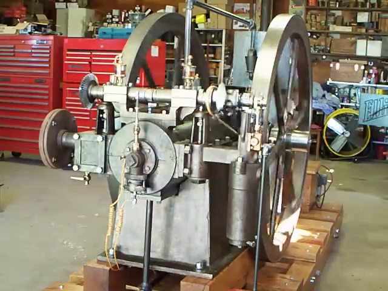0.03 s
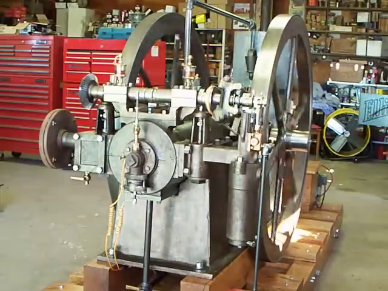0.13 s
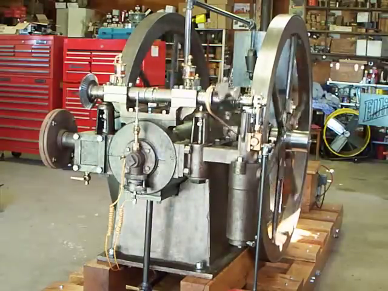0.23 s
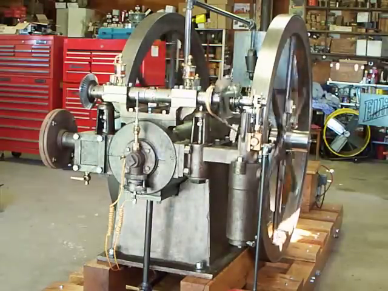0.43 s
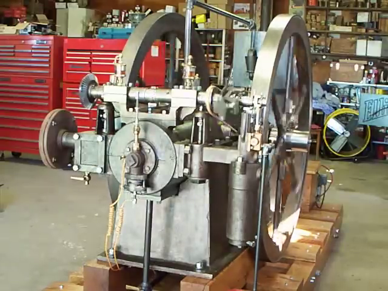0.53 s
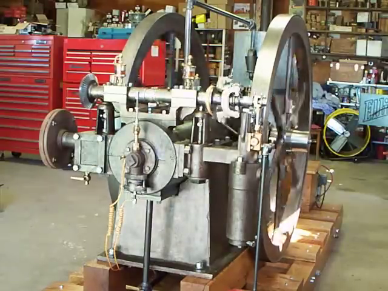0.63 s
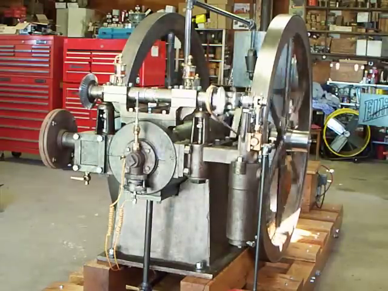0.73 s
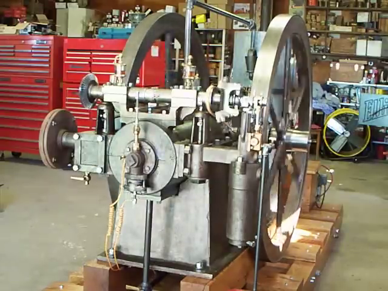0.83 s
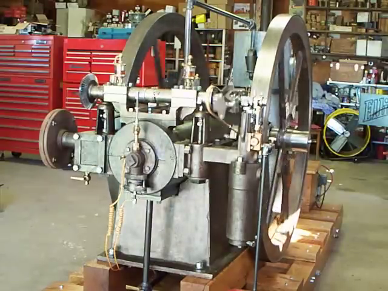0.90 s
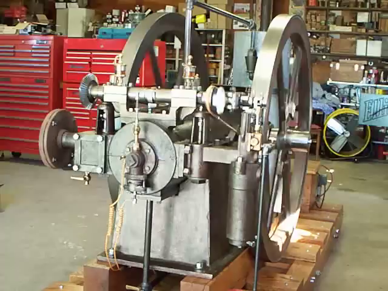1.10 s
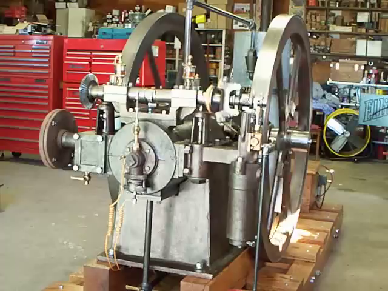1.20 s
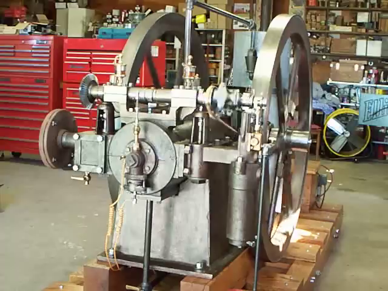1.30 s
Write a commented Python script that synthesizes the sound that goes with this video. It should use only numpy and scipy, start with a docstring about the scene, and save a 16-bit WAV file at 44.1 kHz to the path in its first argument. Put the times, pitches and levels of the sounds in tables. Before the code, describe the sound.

One loud exhaust bang from an antique engine, with quiet mechanical clatter in a workshop.

```python
"""One sharp bark and a ringing echo, with soft rubbing, a faint squeak, knocks and clicks around it.
An antique stationary engine fires once in a workshop, heard through a small microphone.
Gas rushes out of the exhaust with a few sudden jumps in pressure, leaving iron and room ringing.
The quieter sounds come from the coasting machine: its wheels, bearings, valves and linkage."""
import sys
import numpy as np
from scipy import signal
from scipy.fft import rfft, irfft
from scipy.io import wavfile
from scipy.ndimage import uniform_filter1d

SR = 44100
rng = np.random.default_rng(int(sys.argv[2]) if len(sys.argv) > 2 else 0)


def master(y):
    """Save y as 16-bit WAV."""
    cut = np.clip(np.atleast_2d(y).T, -1, 1)
    pcm = np.round(cut * 32767)  # scale
    wavfile.write(sys.argv[1], SR, pcm.astype(np.int16))


N = 59535
TIME = np.arange(N) / SR

# Bright hiss shared by air, clicks and exhaust: (frequency [Hz], relative level [dB])
HISS_COLOUR = [(300, -40.5), (2000, -18), (3500, -10.5), (5400, -5.5), (6050, -3), (6800, 1.5),
               (7600, -2.5), (9000, -10.5)]


def amp(db):
    """Turns decibels into a number to multiply by."""
    return 10 ** (np.asarray(db) / 20)


def unit(x):
    """Scales a signal to an average strength (rms) of 1."""
    return x / np.sqrt(np.mean(x ** 2) + 1e-20)


def look_up(points, hz):
    """Reads between the rows of a table, on a logarithmic frequency scale."""
    f, value = np.transpose(points)
    return np.interp(np.log(hz + 1), np.log(f + 1), value)


def level(points):
    """Turns rows of (time [s], level [dB]) into a gain for every sample."""
    return amp(np.interp(TIME, *np.transpose(points)))


def colour(x, points):
    """Shapes the tone with rows of (frequency [Hz], gain [dB])."""
    gain = amp(look_up(points, np.fft.rfftfreq(2 * N, 1 / SR)))
    return irfft(rfft(x, 2 * N) * gain)[:N]


def noise(points):
    """Noise of strength 1 with the given tone colour."""
    return unit(colour(rng.standard_normal(N), points))


def narrow_noise(hz, width_hz):
    """Noise gathered around one pitch."""
    f = np.fft.rfftfreq(N, 1 / SR)
    peak = 1 / (1 + ((f - hz) / (width_hz / 2)) ** 2)
    return unit(irfft(rfft(rng.standard_normal(N)) * peak, N))


def wander(samples):
    """A random wobble; smoothing over more samples makes it slower."""
    return unit(uniform_filter1d(rng.standard_normal(N), samples))


def flutter(depth_db, samples):
    """A fast, random flicker in loudness."""
    return unit(amp(depth_db * wander(samples)))


def burst(start, rise_s, hold_s, fall_s):
    """Loudness that rises in a straight line, holds, then dies away."""
    t = TIME - start
    return np.clip(t / rise_s, 0, 1) * np.exp(-np.maximum(t - rise_s - hold_s, 0) / fall_s)


def thuds(rows):
    """Blows that stop ringing after a few vibrations."""
    blows = np.zeros(N)
    for start, db, hz, length in rows:
        t = TIME - start
        swell = np.sin(np.pi * np.clip(t / length, 0, 1)) ** 2
        blows += amp(db) * swell * np.sin(2 * np.pi * (hz * t + rng.random()))
    return blows


def room(x, gap_s, build_s):
    """The workshop throws back scattered echoes, thin in the bass, each band fading at its own speed."""
    # How long the echo lasts: (frequency [Hz], time to fade by 60 dB [s])
    fade_times = [(100, .25), (250, 0.14), (500, 0.69), (1000, 0.77), (2700, 0.7), (5500, 0.67),
                  (8000, 0.48)]
    # Tone of the echo: (frequency [Hz], gain [dB])
    echo_colour = [(100, -13), (300, -11), (450, -8.5), (600, -4), (850, -6), (1100, -7.5), (1450, -5),
                   (1950, -6), (2400, -4), (3200, -0.5), (5300, 0), (6500, -4), (9000, 1)]
    reflections = rng.choice([-1., 1.], N) * (rng.random(N) < 3000 / SR)  # about 3000 a second
    hz, t, bands = signal.stft(reflections, SR, nperseg=256)
    fade = amp(-60 * t / look_up(fade_times, hz)[:, None])
    tail = signal.istft(bands * fade, SR, nperseg=256)[1][:N]
    tail *= np.clip((TIME - gap_s) / build_s, 0, 1)
    echo = signal.fftconvolve(x, tail / np.linalg.norm(tail))[:N]
    return colour(echo, echo_colour)


def wheels():
    """Turning flywheels and gears rumble over a low drone."""
    # Tone of the rumble: (frequency [Hz], relative level [dB])
    rumble_colour = [(25, -25.5), (80, -21), (140, -14.5), (190, -6.5), (300, -2.5), (450, 3.5), (700, -7),
                     (1300, -6.5), (3000, -25), (9000, -39)]
    # Loudness of the rumble and of the drone: (time [s], level [dB])
    rumble_levels = [(0, -49), (.15, -47), (.6, -50), (.75, -54), (.9, -52.5), (1.07, -58), (1.25, -55.5),
                     (1.35, -52)]
    drone_levels = [(0, -62), (.18, -51.5), (.36, -74.5), (.5, -68), (.59, -52), (.69, -72), (.9, -68),
                    (1.0, -73), (1.35, -70)]
    rumble = level(rumble_levels) * noise(rumble_colour)
    return rumble + level(drone_levels) * narrow_noise(hz=140, width_hz=16)


def valve_air():
    """Air hisses at the valves."""
    # Loudness of the hiss: (time [s], level [dB])
    air_levels = [(0, -49), (.07, -48.5), (.19, -52.5), (.6, -79), (.82, -76), (.87, -77), (.98, -67),
                  (1.08, -87), (1.31, -68.5), (1.335, -56)]
    return level(air_levels) * noise(HISS_COLOUR) * flutter(depth_db=0.5, samples=120)


def rubbing():
    """The cam and bearings slide with a grainy sound."""
    # Loudness of the sliding: (time [s], level [dB])
    rub_levels = [(0, -49.5), (.03, -45), (.075, -43), (.11, -42.5), (.15, -48.5), (.2, -47.5), (.5, -75),
                  (.755, -68), (.78, -47), (.825, -52.5), (.86, -44), (.94, -54.5), (.99, -50.5),
                  (1.09, -60), (1.13, -57.5), (1.155, -49), (1.22, -58.5), (1.35, -60.5)]
    # Its tone: (frequency [Hz], relative level [dB])
    rub_colour = [(100, -13.5), (400, 2), (800, 0.5), (1250, 1), (2000, -6), (2900, -5.5), (3600, -18),
                  (5200, -23), (7000, -20), (9000, -34.5)]
    return level(rub_levels) * noise(rub_colour) * flutter(depth_db=2, samples=150)


def squeak():
    """A dry bearing sings one thin, wavering note."""
    # Loudness of the note: (time [s], level [dB])
    squeak_levels = [(.04, -55.5), (.075, -44), (.115, -42), (.135, -56.5), (.16, -46.5), (.2, -60),
                     (.25, -76.5)]
    hz = 2870 + 30 * wander(samples=300)
    note = np.sin(2 * np.pi * np.cumsum(hz) / SR)
    return level(squeak_levels) * note * flutter(depth_db=2, samples=200)


def valve_gear():
    """The parts that work the valves click: each click is a bright tick, a clank and a steel ping."""
    # Clicks: (time [s], tick level [dB], clank level [dB])
    clicks = [(0.069, -43, -37), (0.079, -59.5, -42), (0.835, -42, -40), (.911, -43.5, -46),
              (0.951, -48.5, -59), (0.958, -47.5, -57), (.976, -58.5, -51), (.985, -62.5, -52.5),
              (1.122, -56.5, -80), (1.1309, -56.5, -71), (1.148, -59.5, -57.5), (1.157, -67, -52),
              (1.2666, -55, -85), (1.3455, -37, -38)]
    # Tone of the clank: (frequency [Hz], relative level [dB])
    clank_colour = [(100, -33), (600, -9.5), (1300, -3.5), (1700, 2.5), (2200, -4), (3000, -20),
                    (5000, -20), (9000, -44.5)]
    ping_hz, ping_s, ping_boost_db = 1737, 0.0081, 1.5
    tick, clank = noise(HISS_COLOUR), noise(clank_colour)
    sound = thuds([(start - ping_s / 8, clank_db + ping_boost_db, ping_hz, ping_s)
                   for start, _, clank_db in clicks])
    for start, tick_db, clank_db in clicks:
        strike = burst(start, rise_s=0.00067, hold_s=0, fall_s=0.0069)
        sound += strike * (amp(tick_db) * tick + amp(clank_db) * clank)
    return sound


def linkage():
    """The linking rods give dull knocks."""
    # Knocks: (time [s], peak level [dB], pitch [Hz], length [s])
    knocks = [(.759, -46, 1514, 0.0081), (.775, -42.5, 1035, 0.017), (.804, -38, 690, 0.013),
              (.995, -48.5, 912, 0.015), (1.108, -43.5, 441, 0.023), (1.232, -51.5, 209, 0.027)]
    return thuds(knocks)


def iron_ring():
    """The exhaust pipe and iron frame ring on after the shot."""
    # Ringing notes: (pitch [Hz], relative level [dB])
    notes = [(559.9, -51), (737.5, -49), (1357, -52), (1529, -48), (1669, -44), (1798, -44), (1879, -50),
             (2062, -50), (2600, -52), (2724, -49), (2826, -50), (3332, -54), (3424, -58), (3505, -57),
             (5480, -53), (5814, -51), (6584, -52)]
    start_s, rise_s, fade_s, boost_db = 0.25, 0.04, 0.66, 20
    t = np.maximum(TIME - start_s, 0)
    ring = sum(amp(db) * np.sin(2 * np.pi * (hz * t + rng.random())) for hz, db in notes)
    return ring * np.minimum(t / rise_s, 1) * amp(boost_db - 60 * t / fade_s)


def pipe(x):
    """The exhaust pipe strengthens its own natural pitches."""
    # Pipe resonances: (pitch [Hz], width [Hz], boost [dB])
    resonances = [(545, 50, 4), (745, 50, 5), (1700, 110, 8), (1780, 50, 4), (2760, 150, 6), (5860, 180, 7),
                  (6620, 150, 3)]
    return x + sum((amp(db) - 1) * signal.lfilter(*signal.iirpeak(hz, hz / width, SR), x)
                   for hz, width, db in resonances)


def gas_surges():
    """Swirling gas leaves the exhaust in surges of low, middle and hissing noise."""
    # Surges: (time [s], hold [s], low level [dB], middle level [dB], hiss level [dB])
    surges = [(0.197, 0.0089, -28.5, -40.5, -47.5), (0.207, 0.018, -44, -24.5, -17),
              (0.2387, 0.013, -19.5, -15.5, -20.5), (0.26, 0.012, -37, -22.5, -14.5),
              (0.281, .018, -29.5, -25.5, -24.5), (0.3, .02, -43, -28.5, -26)]
    # Tones of the low and the middle noise: (frequency [Hz], relative level [dB])
    low_colour = [(30, -41.5), (70, -23.5), (150, -17), (300, -7.5), (550, -0.5), (1000, -12.5),
                  (2500, -45), (9000, -48)]
    middle_colour = [(60, -35), (300, -18.5), (700, 0), (1200, 0), (1700, 2), (2400, -1), (3400, -14),
                     (5000, -17.5), (9000, -40)]
    gas = np.zeros(N)
    for band, tone in enumerate([low_colour, middle_colour, HISS_COLOUR]):
        loudness = sum(amp(dbs[band]) * burst(start, rise_s=0.0053, hold_s=hold, fall_s=0.0084)
                       for start, hold, *dbs in surges)
        gas += noise(tone) * loudness
    return gas * flutter(depth_db=1.0, samples=80)


def bark():
    """The firing thumps and sends out pressure jumps, each a sharp push and then a weaker pull."""
    # Pressure jumps: (time [s], relative level [dB], length of the push [s])
    jumps = [(.2363, -9.5, 0.00069), (.2381, -5.5, 0.00027), (.2403, -11.5, 0.00072), (.2431, -4.5, 0.001),
             (.2447, -3.5, 0.0005), (0.2458, -12, 0.00041), (0.2487, 2.5, 0.0001), (0.2534, -1.5, 0.0001),
             (0.2554, -17, 0.00038), (.2603, -13.5, 0.00041)]
    # Low thumps: (time [s], peak level [dB], pitch [Hz], length [s])
    thumps = [(.201, -22.5, 330, 0.011), (.233, -24, 377, 0.024), (.281, -19.5, 299.4, .014)]
    pressure = np.zeros(N)
    for start, db, push_s in jumps:
        age = np.maximum(TIME - start, 0) / push_s
        pressure += amp(db) * (TIME > start) * (1 - age) * np.exp(-age)
    cracks = colour(pressure, [(50, -26), (250, -7), (1200, 6), (3000, -5), (8000, -16.5)])
    return cracks + thuds(thumps)


def scene():
    """One shot and the coasting machine in the workshop."""
    shot = gas_surges() + bark()
    clatter = valve_gear() + linkage()
    shot_echo = amp(-4.5) * room(pipe(shot), gap_s=0.0096, build_s=0.047)
    clatter_echo = room(clatter, gap_s=0.003, build_s=0.008)
    ring = iron_ring()
    coasting = rubbing() + valve_air() + squeak() + wheels()
    return (coasting + clatter + clatter_echo + ring + shot + shot_echo)[None]


def record(dry):
    """A small microphone gently squashes the shot, dips near 4200 Hz and loses the highest treble."""
    # Tone of the microphone: (frequency [Hz], gain [dB])
    microphone_colour = [(20, -14), (120, -3.5), (300, -3.5), (3400, -2), (3800, -7), (4200, -27.5),
                         (4550, -8.5), (5100, -2.5), (7800, -0.5), (8400, -7), (9000, -27)]
    ceiling, cutoff_hz = 0.51, 9050
    squashed = ceiling * np.tanh(dry[0] / ceiling)
    heard = colour(squashed, microphone_colour)
    treble_cut = signal.firwin(601, cutoff_hz, window=("kaiser", 9), fs=SR)
    return signal.oaconvolve(heard, treble_cut, "same")[None]


dry = scene()
out = record(dry)
master(out)
```